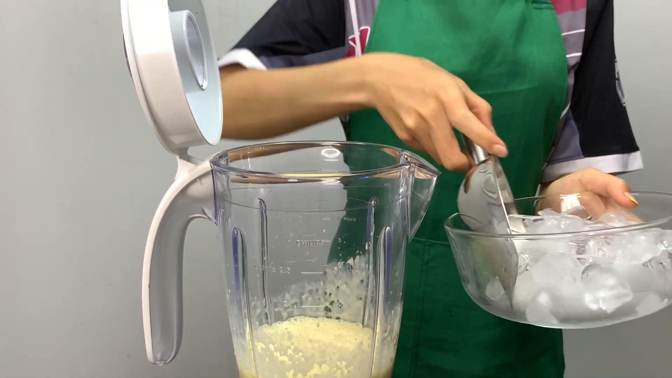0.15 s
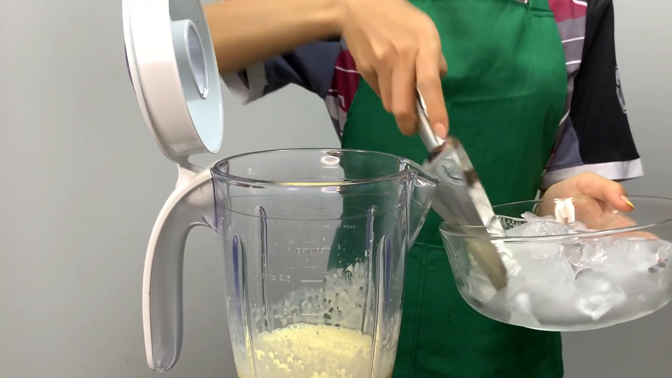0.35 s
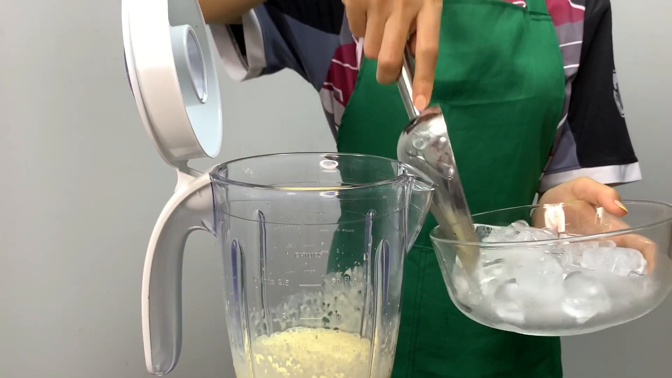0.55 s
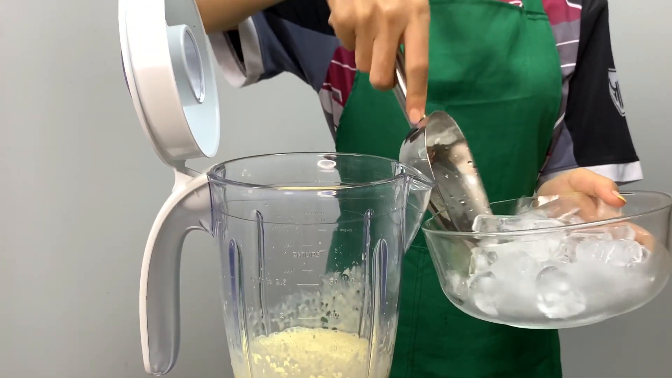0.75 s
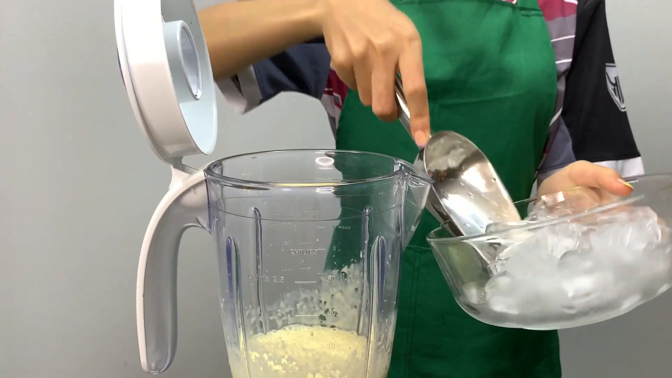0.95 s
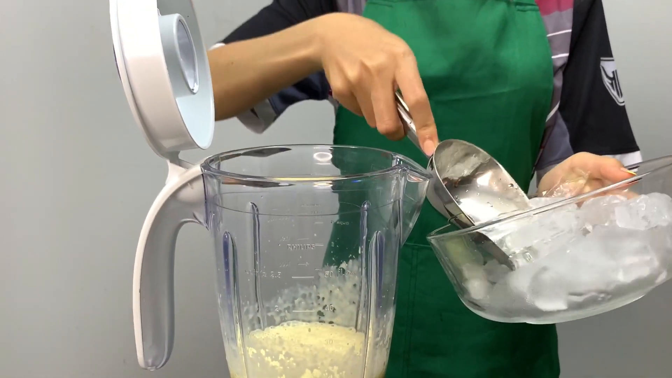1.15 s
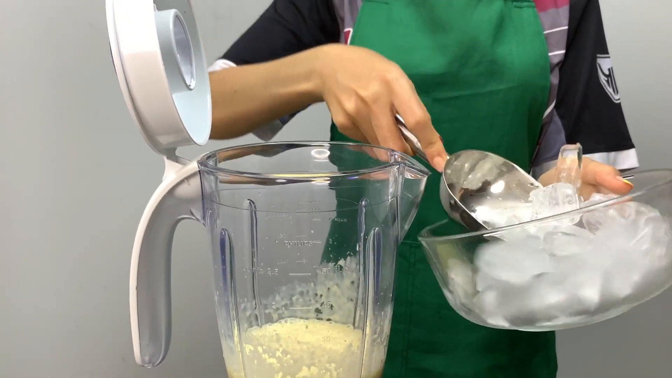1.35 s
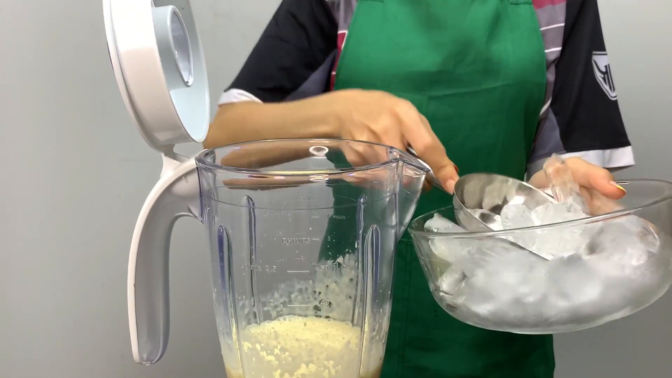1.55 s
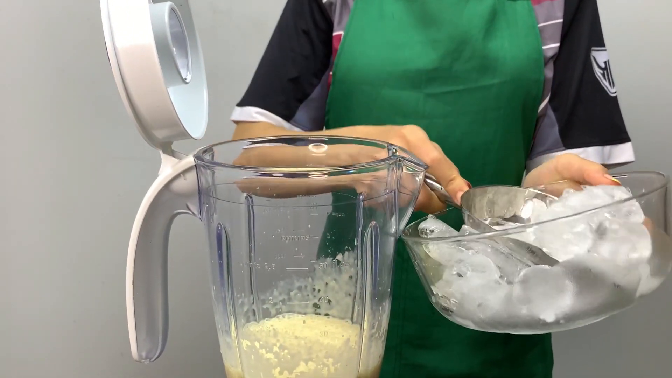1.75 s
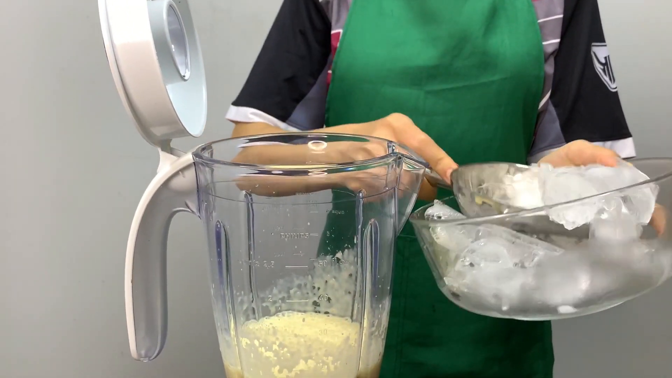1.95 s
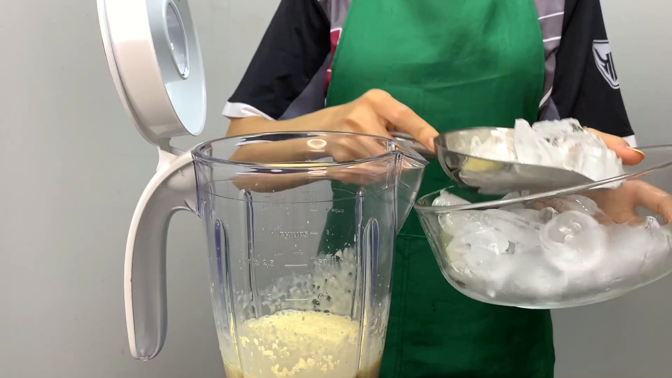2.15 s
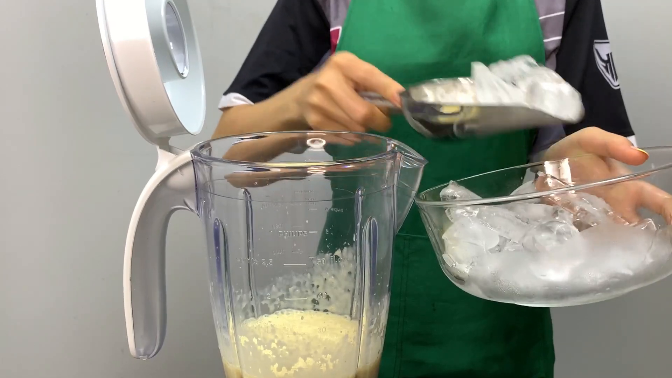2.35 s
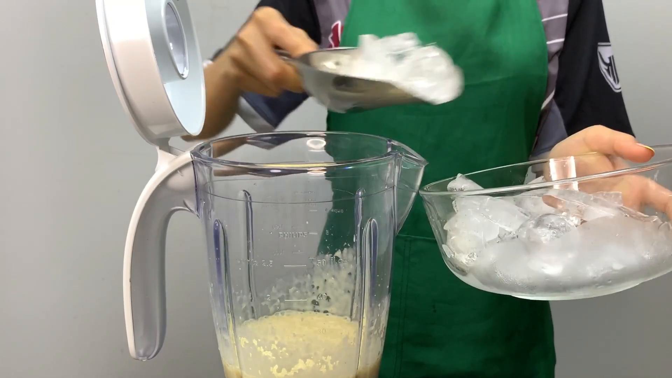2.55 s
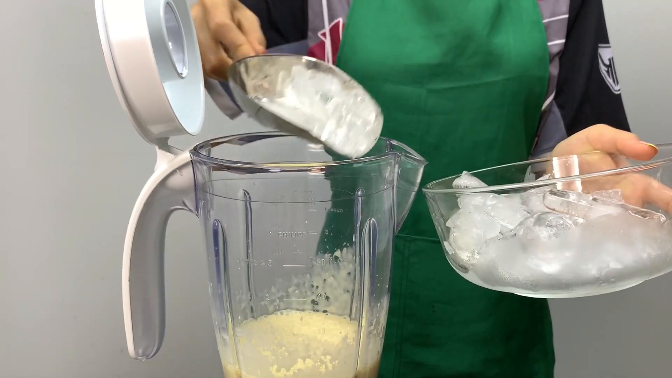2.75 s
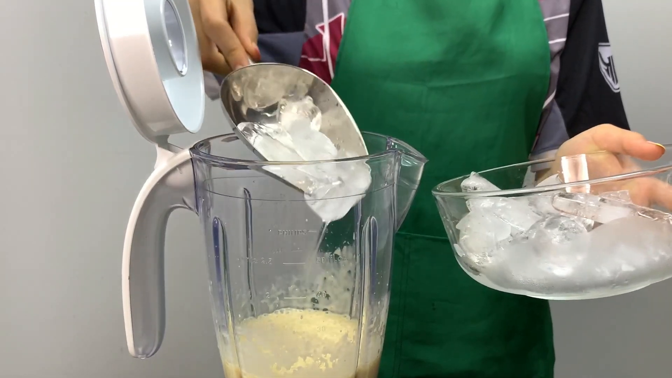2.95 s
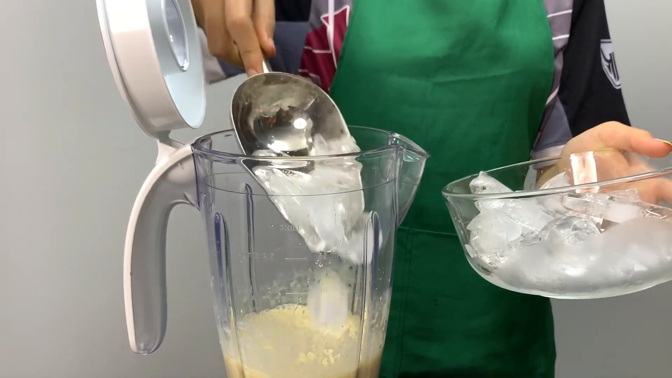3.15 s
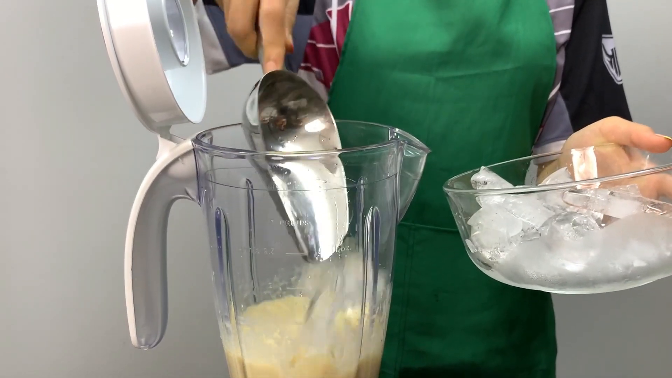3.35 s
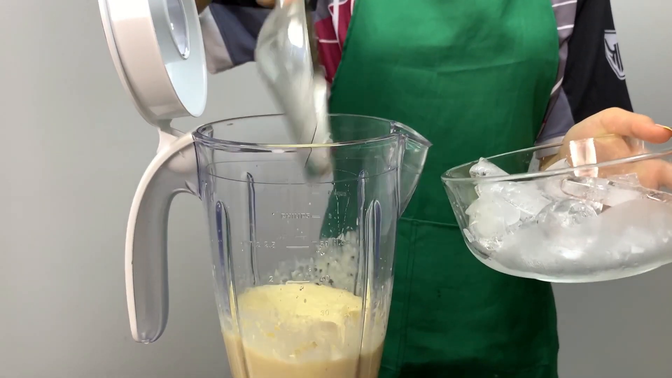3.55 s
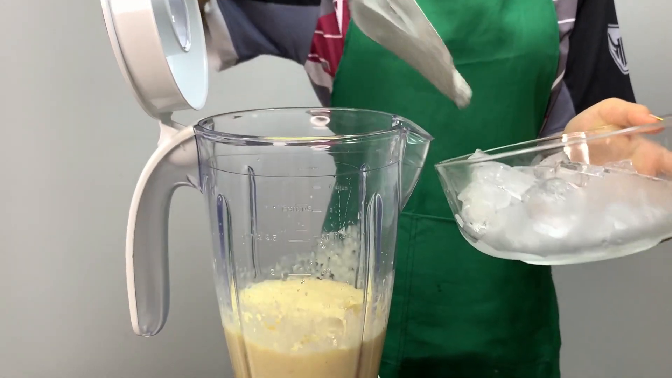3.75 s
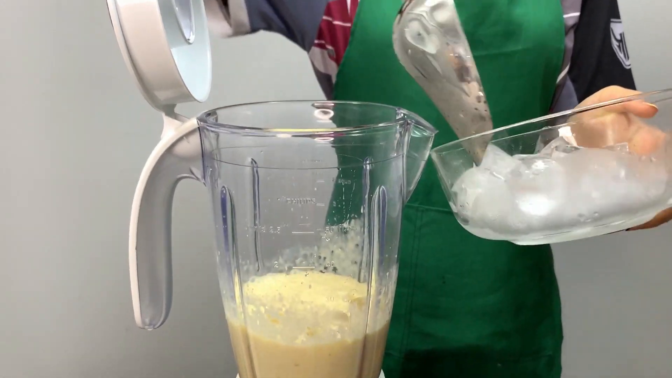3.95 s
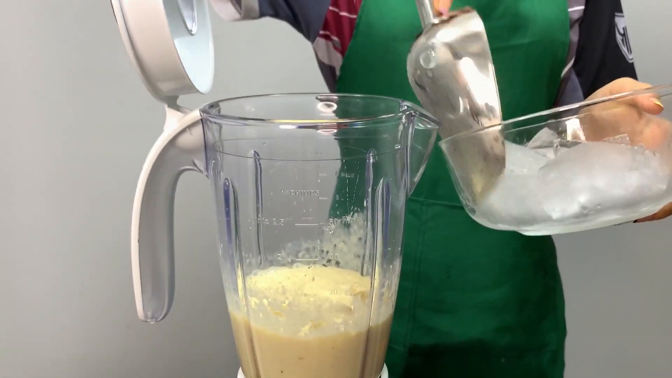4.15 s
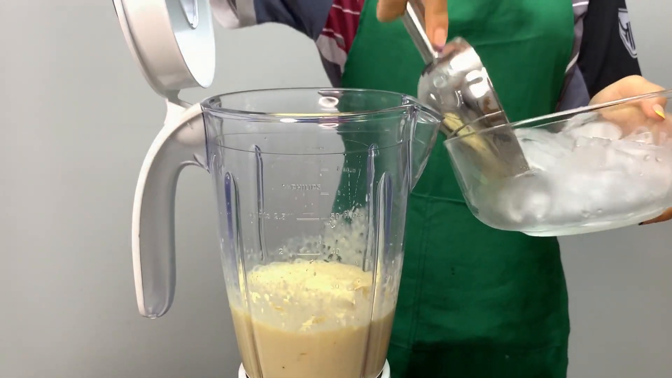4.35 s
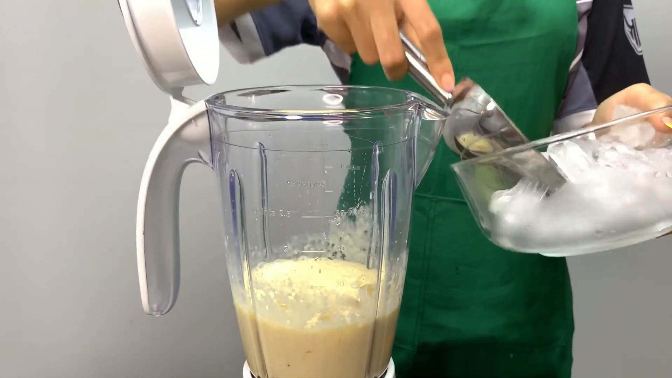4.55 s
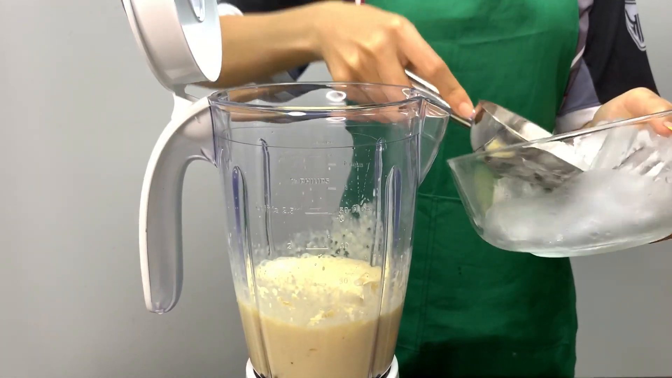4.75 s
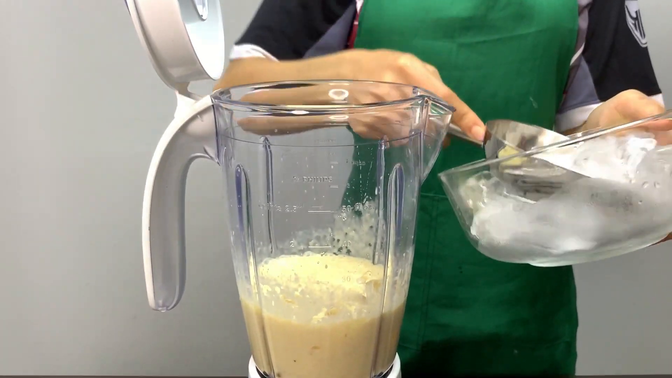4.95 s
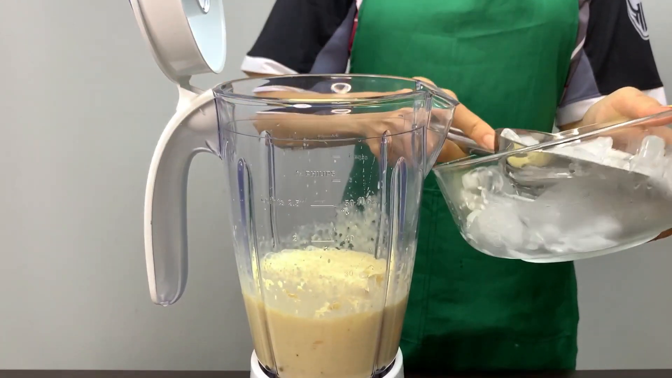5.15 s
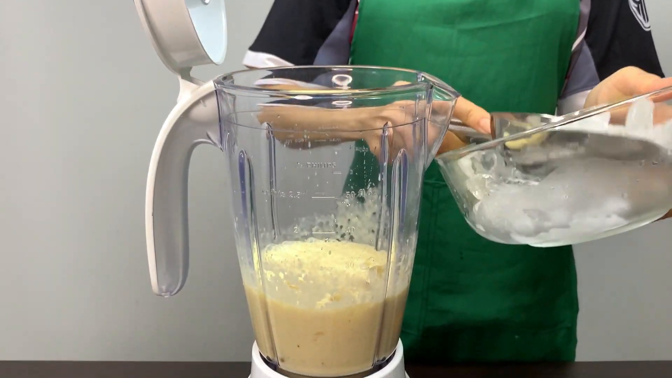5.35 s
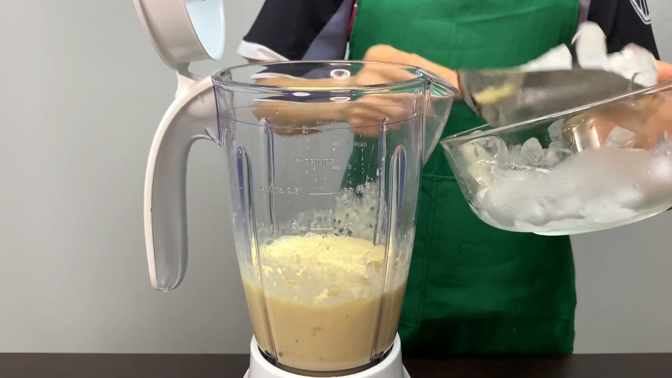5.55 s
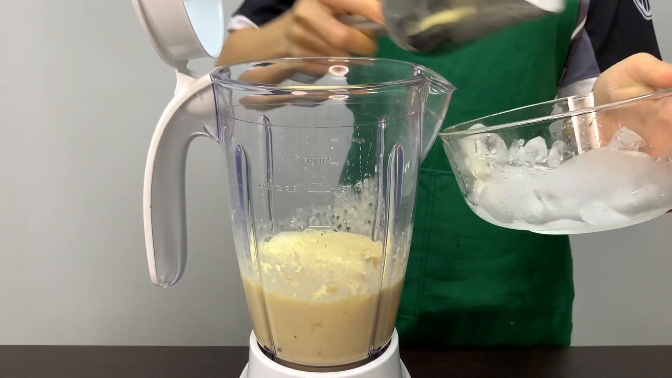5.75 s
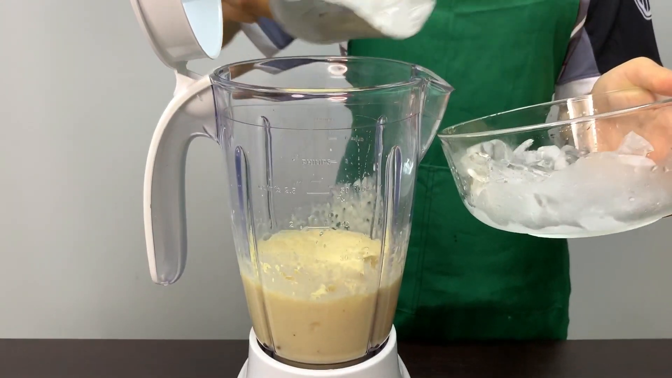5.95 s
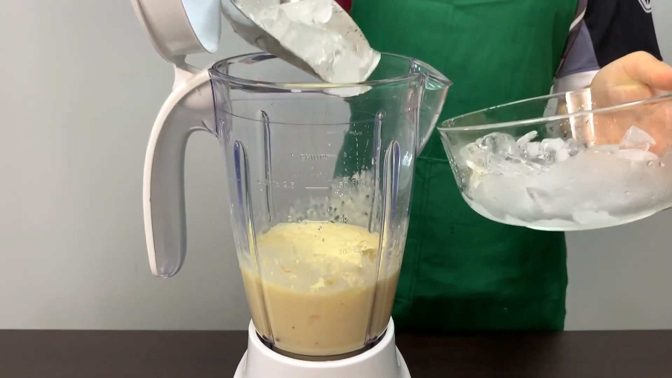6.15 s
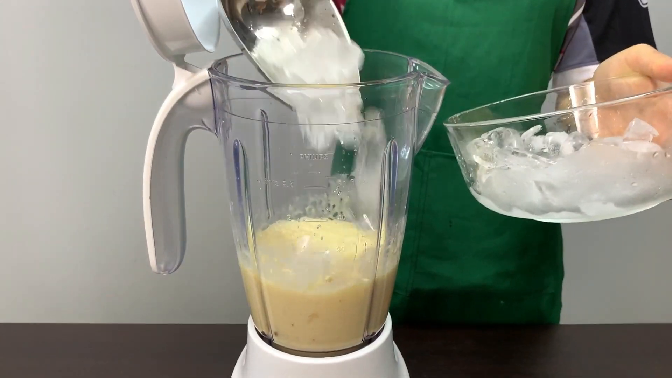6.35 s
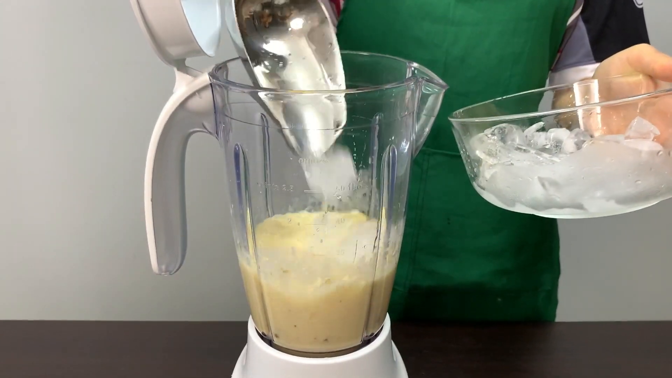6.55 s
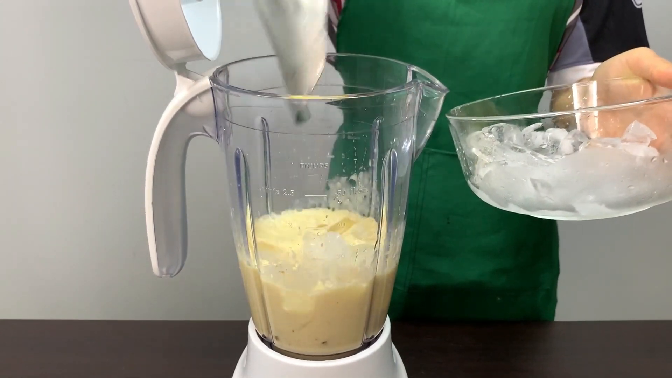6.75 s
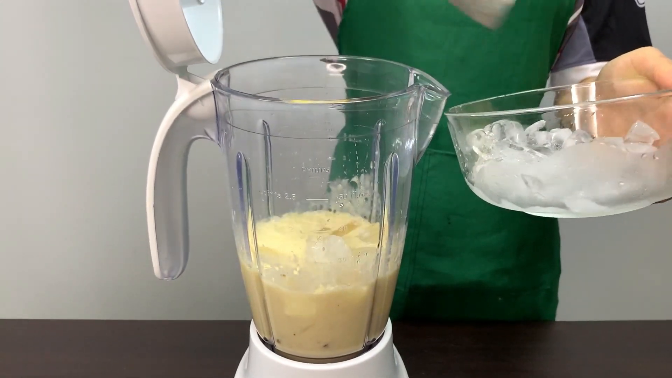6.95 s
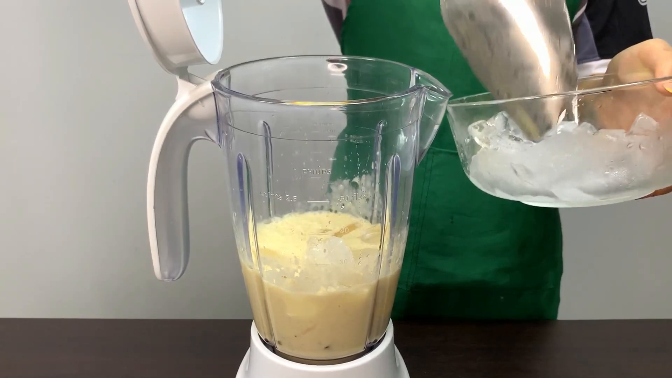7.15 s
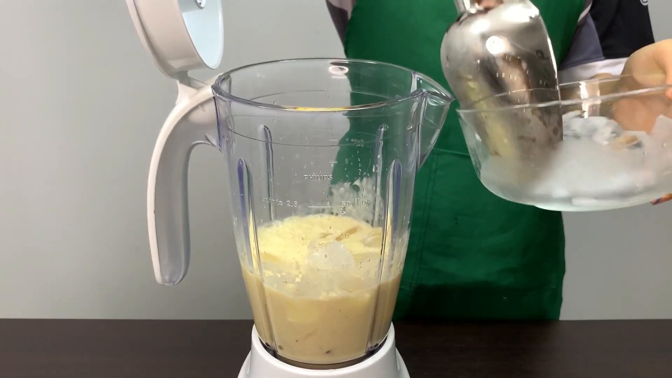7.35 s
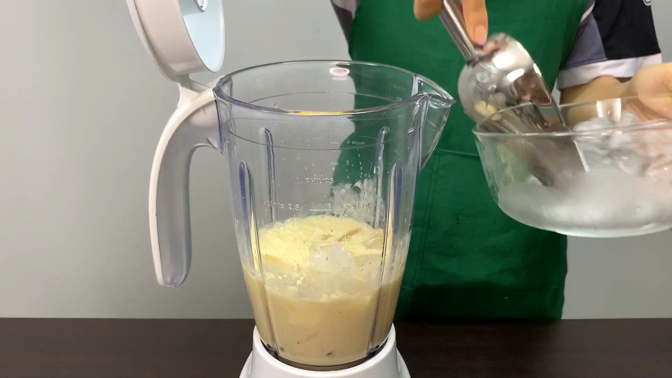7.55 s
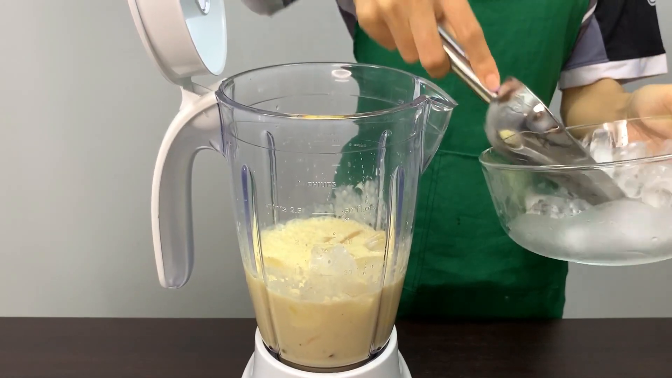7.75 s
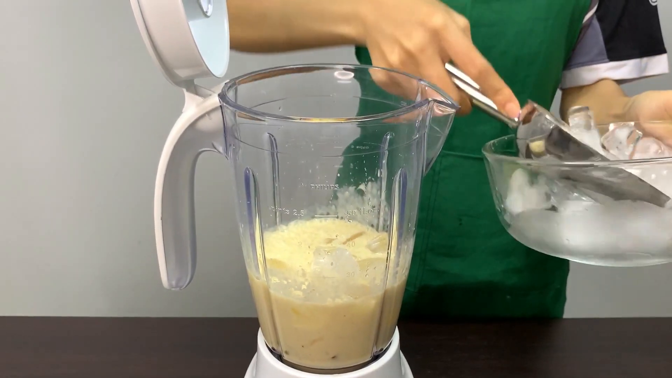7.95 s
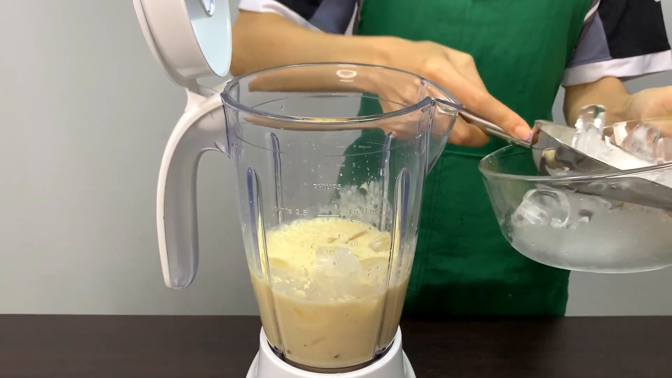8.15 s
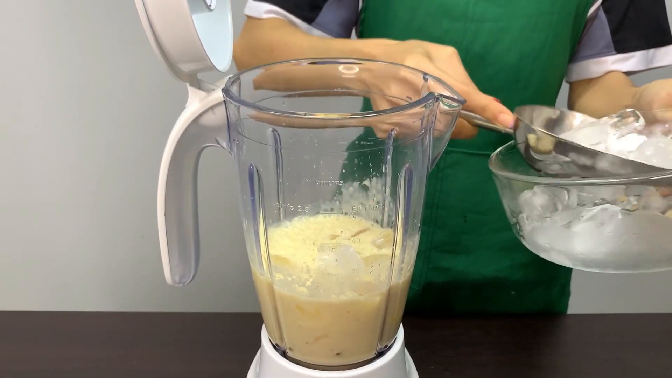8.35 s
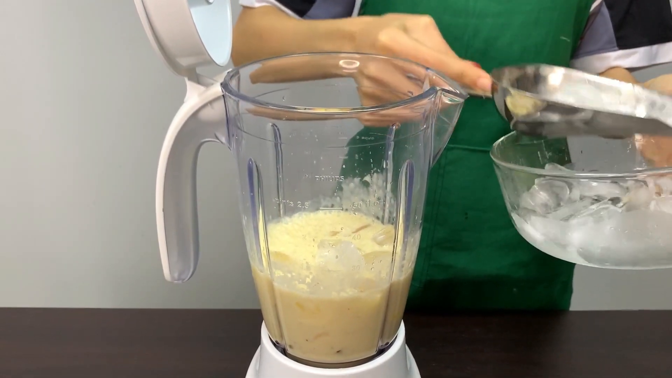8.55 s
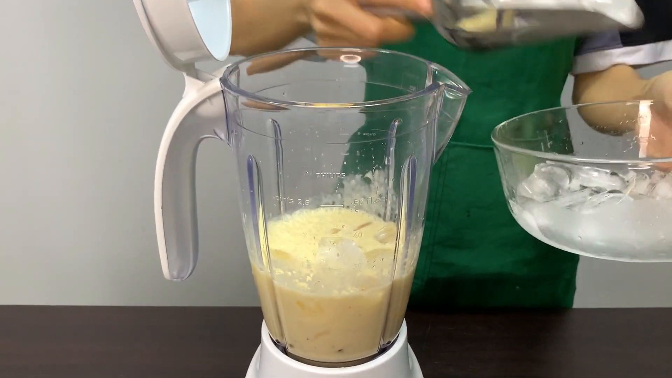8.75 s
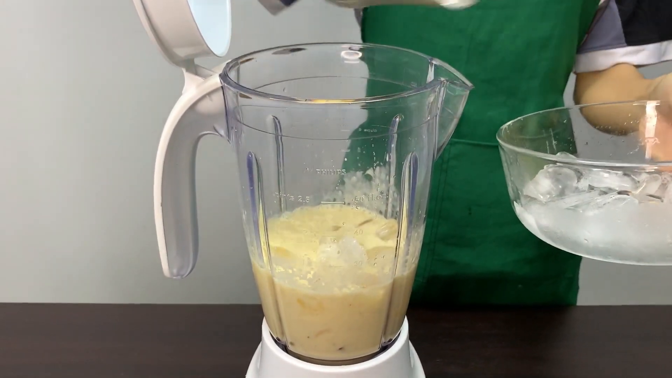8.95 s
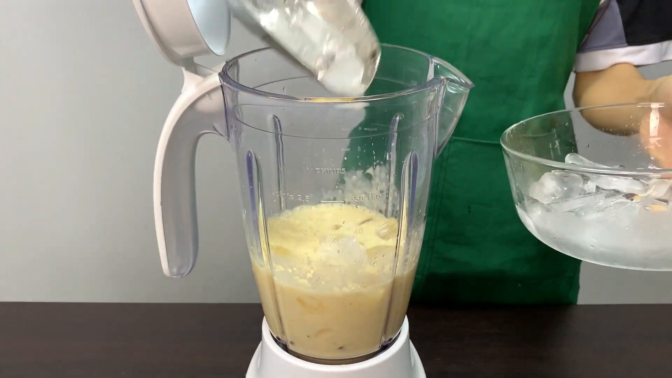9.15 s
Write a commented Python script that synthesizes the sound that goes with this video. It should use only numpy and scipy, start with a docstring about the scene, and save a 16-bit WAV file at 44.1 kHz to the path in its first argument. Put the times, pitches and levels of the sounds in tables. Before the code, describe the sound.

Wet ice cubes crack and rattle as a steel scoop pushes into them, its edge scraping and briefly ringing. After a short quiet carry, cubes drop into a plastic jar, knocking dully with soft bass thumps in the thick liquid. A second scoop and a denser pour follow, then a third dig that fades away. Close microphones, short bright room echoes, soft air hum.

```python
"""A metal scoop digs ice cubes from a glass bowl three times and tips two loads into a plastic blender jar.
Cubes crack and ring as damped modes; buried steel grinds as ticks through drifting resonances.
The struck scoop rings in sheet-metal modes; wet ice squeaks as slips drive a gliding resonance.
Falling ice gives sagging notes, dull knocks and bass pushes in the drink.
A small hard kitchen echoes and booms over a ventilation murmur; a close microphone pair listens."""
import sys
import numpy as np
from scipy import signal
from scipy.fft import rfft, irfft, next_fast_len
from scipy.io import wavfile
from scipy.ndimage import uniform_filter1d

SR = 44100
rng = np.random.default_rng(int(sys.argv[2]) if len(sys.argv) > 2 else 0)


def waveform_to_disk(signal):
    """Save audio, clipped to [-1, 1], as 16-bit WAV at the path in sys.argv[1]."""
    frames = np.transpose(np.atleast_2d(signal))
    scaled = np.clip(frames, -1, 1) * 32767
    samples = np.round(scaled).astype(np.int16)
    wavfile.write(sys.argv[1], SR, samples)


N = 406161

# All levels in the tables are relative; the mix sets the final gains.
# Prominent cube clacks: (time [s], level [dB], lowest ring pitch [Hz], treble over level [dB],
# contact t60 [s]: short = clean crack, long = crunch)
CLACKS = [(.0805, -56.5, 2690, 0.5, 0.06), (.194, -72, 1000, -13, .02), (.256, -52, 1900, -14, 0.17),
          (.281, -49.5, 1460, -6, 0.11), (.402, -56.5, 1770, 0, 0.09), (.430, -50.5, 1400, -7, 0.089),
          (.474, -51, 1630, -11, .07), (.525, -52, 5900, 4.5, 0.087), (.546, -45.5, 6300, -7, 0.077),
          (.5754, -40.5, 6320, 1.5, .03), (.6015, -39, 1580, -19, 0.092), (.687, -52, 2360, -2, .03),
          (.733, -50, 6400, -1.5, 0.026), (.789, -38.5, 3160, -11.5, .025), (.8212, -39.5, 4040, -14, .05),
          (.842, -41, 4080, -13, .04), (.860, -41.5, 4000, -22.5, .05), (.9097, -39, 1680, 0.5, 0.031),
          (.998, -48, 1490, -16, 0.033), (1.049, -43, 1590, -13, .015), (1.071, -38.5, 3270, -3.5, 0.021),
          (1.085, -36.5, 6360, 3, 0.026), (1.0978, -32, 1350, -8.5, 0.061), (1.186, -38, 1900, -0.5, 0.026),
          (1.1928, -36, 3370, -4, 0.036), (1.259, -50, 2520, 3, .04), (1.3367, -31.5, 1320, -9.5, 0.056),
          (1.376, -34.5, 1960, -19, 0.036), (1.491, -31.5, 980, -7, 0.047), (1.552, -29, 1406, -5, .035),
          (1.582, -36, 2040, -2, 0.045), (1.663, -33, 1400, -8, .05), (1.704, -36.5, 3180, -3, 0.029),
          (1.722, -35, 1399, -10, .05), (1.7492, -35, 1360, -2.5, .05), (1.787, -37.5, 1580, -5, .02),
          (1.8972, -42.5, 7670, 4.5, 0.064), (1.9936, -39.5, 2690, -2.5, 0.042), (2.12, -42, 920, -18, .04),
          (2.14, -29.5, 2840, -10, 0.055), (2.154, -39.5, 2940, -17, 0.049), (2.222, -44, 1580, -15, 0.055),
          (2.548, -54.5, 2160, -23, .08), (2.602, -50, 1630, -25, 0.084), (2.607, -52, 4470, -19, .02),
          (2.62, -56.5, 1370, -18, 0.033), (2.639, -58.5, 1990, -25, .06), (2.93, -49.5, 3000, -15, 0.041),
          (2.9415, -33.5, 1670, -9.5, 0.023), (2.9524, -31, 1100, -5.5, 0.037),
          (2.975, -44, 2330, -16, .04), (3.092, -49.5, 4000, -1, .025), (3.1288, -35.5, 1070, -15, 0.026),
          (3.146, -44, 1100, -19.5, 0.033), (3.208, -40.5, 1120, -4, 0.079), (3.296, -46.5, 2800, 1.5, .04),
          (3.3088, -38.5, 3113, -1.5, .04), (3.3271, -25.5, 2496, -1, 0.067), (3.353, -34, 1900, -6, .02),
          (3.3694, -33, 1450, -2, .04), (3.387, -40, 2300, -7.5, .02), (3.402, -33, 1990, -2.5, .025),
          (3.412, -39, 1300, -4, .02), (3.4275, -25, 4150, -6.5, .03), (3.471, -33, 1497, -21, 0.034),
          (3.61, -56.5, 1100, -21.5, .03), (3.66, -55.5, 1790, -18, 0.12), (3.984, -61, 1510, -21, .03),
          (4.0121, -46, 1640, -8, .04), (4.034, -54, 1100, -16, .03), (4.062, -52.5, 3920, -19.5, 0.016),
          (4.072, -51.5, 2200, -23, 0.028), (4.1415, -27.5, 1256, 0, 0.036),
          (4.157, -41.5, 1370, -15, 0.027), (4.2103, -37.5, 2890, 2.5, 0.06),
          (4.312, -35.5, 2460, -1.5, 0.038), (4.3955, -36.5, 1590, -5.5, 0.041),
          (4.458, -40.5, 1530, -5, 0.044), (4.515, -40, 1387, -7, .04), (4.54, -51, 3330, -18, 0.049),
          (4.6169, -34, 3550, -1, 0.11), (4.682, -35.5, 1750, -5, 0.082), (4.718, -32.5, 1870, -4.5, 0.063),
          (4.774, -36, 1900, -10, .025), (4.804, -37.5, 2260, -4, .025), (4.835, -34, 1630, -4.5, 0.049),
          (4.931, -38, 3600, -21, 0.044), (4.963, -36, 3450, -13, 0.053), (4.991, -33.5, 1400, -19, 0.022),
          (5.039, -38, 6190, -7.5, .04), (5.079, -40.5, 1440, -12, .04), (5.133, -40, 1430, -3, 0.05),
          (5.181, -35.5, 1440, -12, 0.025), (5.199, -37.5, 2170, -17, .025), (5.222, -36, 1050, -6.5, .05),
          (5.274, -42.5, 1460, -3, .05), (5.295, -41, 1600, -4.5, 0.031), (5.528, -61, 1450, -9, 0.027),
          (5.564, -54.5, 710, -14, 0.034), (5.649, -52, 6100, -10, .04), (5.6565, -41.5, 1720, 2, 0.024),
          (5.723, -45.5, 5360, -7, 0.039), (5.737, -60.5, 1510, 4, .025), (5.752, -51.5, 4640, 9, 0.022),
          (5.772, -56.5, 3897, 12.5, 0.021), (5.8421, -60, 4640, 13.5, 0.077),
          (5.953, -59, 1640, -2, 0.066), (6.013, -57, 3520, -13, .025), (6.0447, -51.5, 2930, -16, .02),
          (6.097, -61, 1490, -23, .03), (6.282, -49.5, 3880, -3, 0.13), (6.337, -35.5, 1770, -3, 0.021),
          (6.3579, -30.5, 4200, 3, 0.034), (6.4143, -29, 1110, -4, .03), (6.4295, -28, 3460, -6.5, .03),
          (6.451, -28.5, 1316, -8.5, 0.018), (6.463, -35, 2210, -6, .02), (6.4882, -30, 2900, -1, 0.023),
          (6.516, -32, 1210, -3, .025), (6.5228, -24.5, 1106, -7, .03), (6.535, -36, 1500, -6, .03),
          (6.545, -29.5, 4040, -8, .035), (6.595, -38, 2580, -4, 0.017), (6.608, -28.5, 1030, -12, 0.023),
          (6.618, -35.5, 3700, 1.5, .025), (6.637, -30, 3830, -3.5, 0.021), (6.648, -38, 2993, -12.5, .02),
          (6.654, -34.5, 1540, -18, .025), (6.707, -36, 2430, -7.5, .02), (6.712, -36, 1640, -4.5, 0.025),
          (6.76, -45, 1400, -19, 0.036), (7.146, -60, 1000, -18, 0.012), (7.2986, -49.5, 8400, -5, 0.044),
          (7.313, -45, 3850, -3, 0.063), (7.421, -46, 3180, -12, .012), (7.444, -52.5, 3870, 0, 0.033),
          (7.564, -41.5, 3130, -8, 0.026), (7.582, -37, 1780, -12, .05), (7.647, -49, 1330, -16, 0.045),
          (7.674, -47.5, 1313, -22, 0.043), (7.721, -38.5, 1360, -24, 0.034),
          (7.749, -37.5, 1342, -21, 0.037), (7.7696, -34.5, 1740, -7.5, 0.072),
          (7.83, -27.5, 3160, -8.5, 0.018), (8.0057, -33.5, 1510, -4.5, .04),
          (8.026, -29.5, 1520, -4.5, 0.04), (8.0387, -27, 2940, -8, 0.061), (8.073, -31, 3550, -5, 0.068),
          (8.1596, -30, 1350, -6.5, 0.03), (8.1724, -28.5, 2780, -24, 0.017),
          (8.245, -43, 3300, -18, 0.018), (8.279, -37.5, 2940, -22, 0.016), (8.34, -38.5, 3380, -6, .03),
          (8.355, -35, 2867, -9, .04), (8.3693, -34.5, 1480, -6, 0.062), (8.4127, -41.5, 3520, 6.5, 0.076),
          (8.4563, -28.5, 2856, -9.5, .03), (8.465, -34.5, 1793, -2.5, .015), (8.501, -40.5, 910, -7, .06),
          (8.515, -41, 2600, 4, 0.033), (8.5327, -34.5, 3200, -2.5, 0.015), (8.552, -55, 1600, -10, 0.027),
          (8.577, -44, 3040, -13, .04), (8.626, -48, 1640, -5, .025), (8.681, -46.5, 3270, -5.5, .03),
          (8.715, -53.5, 4000, 1, .025), (8.741, -61.5, 3100, 9.5, 0.035),
          (8.762, -49.5, 1900, -18.5, 0.057), (8.777, -50.5, 1560, -18, .025),
          (8.801, -51, 2530, -9, 0.026), (8.868, -58, 2700, 0, 0.021), (9.084, -84, 8200, 2, 0.014),
          (9.117, -85, 1216, -25, .02)]
# Dull blows on jar, drink and bowl: (time [s], knock [dB], middle pitch [Hz], bass push [dB])
THUDS = [(.602, -57.5, 720, -81), (1.1, -44, 700, -74), (1.492, -60, 700, -65), (1.702, -61, 388, -49),
         (1.775, -57, 406, -50), (2.075, -69, 428, -64), (2.245, -46.5, 468.5, -50.5),
         (2.941, -41.5, 546, -62), (2.953, -44, 602, -57.5), (2.974, -39.5, 456, -51.5),
         (2.991, -42, 385, -47.5), (3.129, -35.5, 420, -47), (3.33, -39.5, 468, -40.5),
         (3.38, -40.5, 495, -45.5), (3.44, -38.5, 490, -51.5), (3.472, -37, 517, -47),
         (3.509, -38.5, 507, -49), (3.565, -54.5, 470, -52), (3.65, -59.5, 447, -49.5),
         (3.984, -49, 490, -52), (4.143, -42.5, 592, -71), (4.312, -52, 610, -66.5),
         (4.396, -51, 557, -75.5), (4.46, -65, 620, -72), (4.618, -58, 640, -76), (4.681, -51, 520, -64.5),
         (5.735, -51.5, 443, -54.5), (6.187, -37.5, 532, -43.5), (6.338, -41, 550, -49.5),
         (6.36, -45.5, 474, -37.5), (6.45, -33.5, 510, -37), (6.473, -33.5, 490, -54.5),
         (6.523, -36, 490, -38.5), (6.564, -38, 544.7, -40), (6.594, -35, 510, -52),
         (6.622, -49.5, 520, -40), (6.649, -45.5, 500, -44.5), (6.683, -37.5, 588, -52.5),
         (6.71, -35, 527, -40.5), (6.744, -48, 563, -56), (7.146, -51, 584, -61.5), (8.172, -43, 670, -66)]
# Blows on the scoop: (time [s], ring [dB], crack [dB], brightness [dB/octave], contact t60 [s],
# pitch favoured by the struck spot [Hz], share of ring time left by the load [1])
SCOOP_HITS = [(1.086, -46, -39.5, 0, .048, 1380, .8), (2.139, -41, -48, -10.5, .059, 4150, 1),
              (2.164, -46, -51, -4, .05, 4150, .9), (4.1417, -32.5, -38.5, 2, .05, 1330, .9),
              (4.158, -41.5, -55, 3, .042, 2900, 1), (7.321, -36.5, -37, -3.5, .09, 3833, 0.37),
              (7.343, -44, -44, 14, .031, 3833, .45), (7.831, -53, -33, 2.5, .06, 3230, .5),
              (8.455, -31.5, -42, -1, .03, 4200, .35), (8.465, -39, -53, 1, .02, 2900, .25),
              (8.5, -40, -43, -3, 0.1, 3030, .4)]
# Nominal modes of the unloaded scoop: (frequency [Hz], level [dB], t60 [s])
SCOOP_MODES = [(1250, -12.5, 0.16), (1406, -10, 0.05), (1646, -4.5, .15), (2430, -12, .08),
               (2896, 1.5, .12), (3160, -2, 0.07), (3320, -2.5, 0.17), (3833, -8, 0.33), (4150, -4.5, .13),
               (4230, 4.5, 0.069), (5820, 6.5, 0.077), (6260, -11.5, 0.092), (6770, -5.5, 0.19),
               (7000, -8.5, 0.097), (8160, -9.5, 0.48), (8400, -3.5, .13), (9040, -9, .15),
               (9620, -9.5, .15), (10040, -6.5, .15), (10510, -8, .12), (13200, -4, .08)]
# Pushes of the scoop into the heap: (start [s], hardest [s], end [s], level [dB], easing by the end [dB])
DIGS = [(0.213, 0.858, 1, -49, -10.5), (0.998, 1.567, 1.86, -38, -9.5), (1.802, 2.09, 2.226, -47.5, -2),
        (4.002, 4.721, 5.02, -41, 0.5), (5.064, 5.193, 5.284, -41, -4), (7.328, 7.38, 7.6, -58, -2.5),
        (7.602, 8.003, 8.31, -38.5, -9.5), (8.288, 8.367, 8.62, -48, -5)]
# Broad resonances of the buried scoop: (centre [Hz], width [Hz], level [dB])
GRIND_MODES = [(720, 90, -3.5), (1400, 380, 0), (1900, 680, -4), (3700, 1100, -2.5), (6000, 550, -6.5)]
GRIND_SHIFT_DB = 6  # level drift per unit of wander
# Spectrum of digging: (frequency [Hz], density [dB])
DIG_COLOUR = [(100, -34), (300, -3), (520, -9), (720, 0), (1350, -1), (2000, -2), (4000, 0), (5000, -9.5),
              (6200, -6.5), (7600, -18.5), (8300, -6.5), (10000, -19.5), (13000, -7.5), (15500, -27.5)]
# Spectrum of sliding cubes: (frequency [Hz], density [dB])
SLIDE_COLOUR = [(200, -14.5), (600, 2.5), (1200, -5), (2000, 1), (3800, 6), (5000, -8.5), (6400, -5),
                (10000, -7.5), (15500, -12)]
# Spectrum of hard contacts: (frequency [Hz], density [dB])
CRACK_COLOUR = [(100, -36), (350, -11), (750, 2.5), (1400, 5.5), (2200, 5), (4000, 5), (5000, -0.5),
                (6200, -0.5), (7600, -8), (8400, -8.5), (11000, -9), (14000, -11.5), (15500, -20)]
# Spectrum of ventilation: (frequency [Hz], density [dB])
AIR_COLOUR = [(20, -22), (50, -11.5), (90, -3.5), (115, 5), (135, -7), (190, 2.5), (260, -7), (380, -3),
              (520, -14), (1000, -20), (2500, -29.5), (8000, -41), (16000, -50.5)]
# Low standing waves of kitchen and jar: (frequency [Hz], level [dB], t60 [s])
BOOM_MODES = [(117.7, -60.5, 1.9), (153.8, -59.5, 1.2), (192.2, -57.5, 0.72), (229, -63.5, 0.98)]
# Diffuse kitchen tail: (frequency [Hz], t60 [s], level [dB])
TAIL = [(130, 1, 1.5), (383, 0.63, -2.5), (1000, 0.56, -1.5), (2800, 0.53, -0.5), (7040, 0.39, -1),
        (14000, 0.32, -3.5)]
# Stereo width: (frequency [Hz], side [dB])
WIDTH = [(40, 0), (150, -14), (400, -8), (900, -1.5), (2500, -0.5), (7800, 2.5), (9000, -2), (12000, -14.5),
         (16000, -16.5)]
# Stereo balance: (frequency [Hz], left over right [dB])
BALANCE = [(100, -0.5), (650, -2), (1000, 1), (3000, 0.5), (4300, -0.5), (5700, -3.5), (7600, -0.5),
           (8200, -7.5), (10000, 0.5)]
# Spectrum of dull knocks: (frequency [Hz], density [dB])
KNOCK_COLOUR = [(80, -25.5), (200, -9.5), (300, -6), (400, 3), (510, -0.5), (630, -0.5), (800, -7),
                (1100, -14), (1600, -18.5), (3000, -26), (7000, -38)]
# Spectrum of bass pushes: (frequency [Hz], density [dB])
PUSH_COLOUR = [(25, -36.5), (55, -15.5), (90, -14.5), (115, -6), (150, 2), (192, 8), (235, 0.5), (300, -28),
               (600, -47), (3000, -77)]
# Spectrum of bumps in the thick drink: (frequency [Hz], density [dB])
SLOSH_COLOUR = [(25, -37.5), (60, -29), (95, -12), (120, 2.5), (190, 1.5), (260, -4), (380, 1), (500, -3),
                (620, -10.5), (760, -19), (1100, -14.5), (2000, -35), (6000, -70.5)]
# Wet ice scraping on steel: (time [s], length [s], first pitch [Hz], last pitch [Hz], level [dB])
SQUEAKS = [(0.787, 0.12, 3030, 3230, -53), (0.84, 0.032, 6300, 6300, -49), (1.343, 0.055, 1170, 1310, -41),
           (1.403, 0.02, 5900, 5100, -39), (1.555, 0.1, 1430, 1270, -42.5),
           (1.995, 0.011, 5860, 6700, -38.5), (2.061, 0.036, 4450, 3150, -41),
           (2.85, 0.059, 2900, 2500, -70), (4.651, 0.051, 1400, 1680, -39),
           (4.818, 0.13, 6260, 5850, -42.5), (4.893, 0.075, 3850, 3520, -40.5),
           (5.008, 0.057, 6150, 6700, -42), (5.139, 0.086, 1400, 1560, -43.5),
           (7.418, 0.01, 3070, 3420, -41.5), (7.54, 0.057, 1680, 1850, -53),
           (7.67, 0.013, 1250, 1290, -45.5), (7.936, 0.018, 5960, 5500, -35),
           (8.342, 0.037, 1400, 1450, -48), (8.778, 0.039, 2390, 2500, -55.5)]
# Load shifting in the carried scoop: (start [s], busiest [s], end [s], level [dB], easing by the end [dB])
CARRIES = [(2.487, 2.606, 2.68, -61, -15), (5.496, 5.802, 6.08, -65.5, -10), (8.6, 8.719, 8.82, -63.5, -17)]
# Load sliding into the jar: (start [s], densest [s], empty [s], ice level [dB], drink level [dB])
POURS = [(3.268, 3.347, 3.48, -44, -44.5), (6.315, 6.45, 6.64, -37, -43)]
# Ice sliver tinkling in the lifted scoop: (time [s], level [dB])
TINKLES = [(2.55, -72), (2.604, -57)]
# Modes of the sliver: (frequency [Hz], level [dB], t60 [s])
SLIVER_MODES = [(6428, 0, 0.2), (6520, -5, .15), (7321, 1, .14)]

BAND_EDGE_HZ = 15800
BLOW_TIME_S = np.arange(SR // 3) / SR
BLOW_SAMPLES = 530  # span over which a blow's level counts
PAN_DB = 5.5  # largest left-right difference of a cube
# Jostling cubes
JOSTLE_LOW_HZ, JOSTLE_HIGH_HZ, JOSTLE_T60_S = 1100, 4200, 0.029
JOSTLE_CRISP_DB, JOSTLE_CRISP_SPREAD_DB = -8, -4
# Smaller cubes landing in the drink; the bass push is relative to the knock
LANDING_HZ, LANDING_SPREAD_OCTAVES, LANDING_WEIGHT_DB = 490, 0.22, -13
# Bowl under each scoop blow; knock and bass push are relative to the crack
BOWL_HZ, BOWL_KNOCK_DB, BOWL_WEIGHT_DB = 565, -17, -33
# Movement: start level below the top, swell exponent (over 1 = quick at first), fade after the end
ENTRY_DB, SWELL_EXPONENT, SETTLE_DB_PER_S = -15, 1.32, 148.5
TOUCH_S = 0.022  # time to bring the first cubes into contact
# Pour: thinning towards its end, delay of the drink, fade of the drink
POUR_EASE_DB, FALL_S, CALM_DB_PER_S = -3, 0.037, 78.5


def amp(db):
    """Decibels to gain."""
    return 10 ** (np.asarray(db) / 20)


def evened(x, size=None):
    """Scales to rms 1, over the first size samples if given."""
    return x / np.sqrt(np.mean(x[..., :size] ** 2) + 1e-20)


def read(points, hz, axis=1):
    """Reads one column of a table on a log-frequency axis."""
    columns = np.transpose(points)
    return np.interp(np.log(hz + 1), np.log(columns[0] + 1), columns[axis])


def add(mix, time_s, sound):
    """Mixes a sound in at a time."""
    part = mix[..., max(round(time_s * SR), 0):][..., :sound.shape[-1]]
    part += sound[..., :part.shape[-1]]


def causal(points, size=2048):
    """Minimum-phase impulse response of a given spectrum."""
    log_gain = np.log(amp(read(points, abs(np.fft.fftfreq(size, 1 / SR)))))
    spectrum = np.exp(np.conj(signal.hilbert(log_gain)))
    return np.fft.ifft(spectrum).real[:size // 2]


def coloured(x, response):
    """Passes a signal through an impulse response."""
    return signal.fftconvolve(x, response)[:len(x)]


def decay(t, t60_s):
    """Exponential decay of 60 dB in t60_s."""
    return np.exp(-np.log(1000) * t / t60_s)


def rise(t, rise_s):
    """Smooth onset that approaches 1."""
    return 1 - np.exp(-t / rise_s)


def ring(modes, t):
    """A sum of dying sines from rows (frequency [Hz], level [dB], t60 [s])."""
    out = 0
    for hz, db, t60_s in modes:
        out = out + amp(db - 60 * t / max(t60_s, .003)) * np.sin(2 * np.pi * min(hz, SR / 2) * t)
    return out


def wander(length, per_s):
    """Random drift of about unit size with per_s new targets a second."""
    place = np.arange(length) * per_s / SR
    targets = rng.standard_normal(1024)
    return np.interp(place, np.arange(len(targets)), targets)


def resonate(x, hz, width_hz):
    """One-pole resonance that follows a pitch curve."""
    turn = np.exp(2j * np.pi * np.cumsum(hz) / SR)
    pole = np.exp(-np.pi * width_hz / SR)
    return (turn * signal.lfilter([1 - pole], [1, -pole], x / turn + 1e-18)).real


def burst(t60_s, t, rise_s=0.00062, uneven_db=4):
    """A contact: noise of uneven strength that builds quickly and dies away, as many tiny impacts do."""
    sizes = amp(uneven_db * np.clip(wander(len(t), per_s=1500), -2, 2))
    return sizes * rng.standard_normal(len(t)) * decay(t, max(t60_s, .002)) * rise(t, rise_s)


def cube(hz, t60_s, t):
    """The few unrelated, quickly damped modes of an irregular cube."""
    second_hz = hz * rng.uniform(1.15, 1.5)
    third_hz = hz * rng.uniform(2.1, 2.2)
    return ring([(hz, 0, t60_s), (second_hz, -6, t60_s), (third_hz, -8, t60_s * 0.27)], t)


def stroke(start_s, peak_s, end_s, db, ease_db, settle_db_per_s):
    """Gain of one movement through ice: it swells, eases off, and dies away after its end."""
    t = np.arange(N) / SR
    swell_db = ENTRY_DB * np.interp(t, [start_s, peak_s], [1, 0]) ** SWELL_EXPONENT
    late_db = np.interp(t, [peak_s, end_s], [0, ease_db]) - settle_db_per_s * np.maximum(t - end_s, 0)
    touch = np.clip((t - start_s) / TOUCH_S, 0, 1)
    return amp(db + swell_db + late_db) * touch * (late_db > -45)


def chance(gain, per_s, spread_db):
    """Collisions that follow the movement: rows (time [s], level [dB], two draws from -1 to 1)."""
    draws = rng.random((int(per_s * N / SR), 4))
    times_s = (np.arange(len(draws)) + draws[:, 0]) / per_s
    strengths = gain[np.minimum((times_s * SR).astype(int), N - 1)]
    rows = []
    for time_s, strength, (size, a, b) in zip(times_s, strengths, 2 * draws[:, 1:] - 1):
        if strength > 0:
            rows.append((time_s, 20 * np.log10(strength) + spread_db * size, a, b))
    return rows


def air(db=-65):
    """The steady low murmur of ventilation: shaped noise."""
    hz = np.fft.rfftfreq(N, 1 / SR)
    noise = rfft(rng.standard_normal((2, N)))
    return amp(db) * evened(irfft(noise * amp(read(AIR_COLOUR, hz)), N))


def clacks(rows, snap_share=0.37, ring_t60_s=0.017, ring_db=-2, split_hz=6300,
           body_db=-1, snap_db=-1, rebound=0.34):
    """Each cube cracks against its neighbour, rings and rebounds; a crisp snap rides on top."""
    out, t, colour = np.zeros((2, N)), BLOW_TIME_S[:4096], causal(CRACK_COLOUR)
    low = signal.butter(3, [330, split_hz], "band", fs=SR, output="sos")
    high = signal.butter(4, split_hz, "high", fs=SR, output="sos")
    for time_s, db, hz, crisp_db, contact_t60_s in rows:
        pan_db = PAN_DB * rng.uniform(-1, 1)
        contact = burst(contact_t60_s, t, rise_s=0.00093)
        add(contact, rng.uniform(0.0033, .012), rebound * burst(contact_t60_s / 2, t))
        crack = evened(signal.sosfilt(low, coloured(contact, colour)), size=BLOW_SAMPLES)
        snap_contact = burst(contact_t60_s * snap_share, t, rise_s=.0003)
        snap = evened(signal.sosfilt(high, coloured(snap_contact, colour)), size=BLOW_SAMPLES)
        note = evened(cube(hz, ring_t60_s, t) * rise(t, .003), size=BLOW_SAMPLES)
        body = evened(crack + amp(ring_db) * note, size=BLOW_SAMPLES)
        clack = amp(body_db) * body + amp(crisp_db + snap_db) * snap
        add(out, time_s, amp([[db + pan_db / 2], [db - pan_db / 2]]) * clack)
    return out


def jostles(gain, per_s, spread_db):
    """Lesser clacks of cubes that the movement pushes together, as rows like those of CLACKS."""
    rows = []
    for time_s, db, size, crisp in chance(gain, per_s, spread_db):
        hz = JOSTLE_LOW_HZ * (JOSTLE_HIGH_HZ / JOSTLE_LOW_HZ) ** ((size + 1) / 2)
        crisp_db = JOSTLE_CRISP_DB + JOSTLE_CRISP_SPREAD_DB * crisp
        rows.append((time_s, db, hz, crisp_db, JOSTLE_T60_S))
    return rows


def rattle(gain, colour, per_s, spread_db, ring_t60_s, grit_t60_s, ring_db, count=160):
    """A crowd of small collisions: each is a gritty scuff and the brief ring of one of the many cubes."""
    out, t = np.zeros(N), BLOW_TIME_S[:1200]
    grains = []
    for hz in np.linspace(800, 9000, count) * rng.uniform(0.93, 1.04, count):
        scuff = evened(burst(grit_t60_s, t, rise_s=0.00037))
        grains.append(amp(ring_db) * evened(cube(hz, ring_t60_s, t)) + scuff)
    slots = int(per_s * N / SR)
    for k, (place, which, size) in enumerate(rng.random((slots, 3))):
        at = min(int((k + 2 * place) * SR / per_s), N - 1)
        if gain[at] > 0:
            size_db = spread_db * (min(-np.log(1 - size), 3) - 1)  # many small, few large
            add(out, at / SR, gain[at] * amp(size_db) * grains[int(which * count)])
    out = coloured(out, causal(colour))
    return evened(out) * np.sqrt(np.mean(gain ** 2))


def grinding(gain, ticks_per_s=170, spread_db=3.0, drift=0.063, drifts_per_s=30, tick_db=-4):
    """The steel edge skips over ice; sharp ticks ring scoop resonances that drift as the contact shifts."""
    ticks = rng.choice([-1, 1], N) * (rng.random(N) < ticks_per_s / SR)
    ticks = ticks * amp(spread_db * np.minimum(rng.exponential(1, N), 3))
    ticks = coloured(ticks, causal(DIG_COLOUR))
    metal = 0
    for hz, width_hz, db in GRIND_MODES:
        shift = amp(GRIND_SHIFT_DB * np.clip(wander(N, drifts_per_s), -2, 1))
        pitch_hz = hz * (1 + drift * wander(N, drifts_per_s))
        metal = metal + amp(db) * evened(shift * resonate(ticks, pitch_hz, width_hz))
    return gain * evened(metal + amp(tick_db) * evened(ticks))


def thuds(rows, note_t60_s=0.057, knock_t60_s=0.054, note_db=-1, knock_db=-2.0, push_db=-3,
          sag=0.28, sag_s=0.0075, push_lag_s=0.01198):
    """Each heavy blow gives a dull knock, a hollow note that sags in pitch, and a later bass push."""
    out, t, knock_colour = np.zeros(N), BLOW_TIME_S, causal(KNOCK_COLOUR)
    push = evened(causal(PUSH_COLOUR, size=8192), size=3 * BLOW_SAMPLES)
    for time_s, db, hz, weight_db in rows:
        turns = np.cumsum(hz * (1 + sag * (np.exp(-t / sag_s) - .5))) / SR
        note = np.sin(2 * np.pi * turns) * decay(t, note_t60_s) * rise(t, 0.00089)
        note = evened(note, size=2 * BLOW_SAMPLES)
        knock = evened(coloured(burst(knock_t60_s, t), knock_colour), size=2 * BLOW_SAMPLES)
        add(out, time_s, amp(db) * (amp(note_db) * note + amp(knock_db) * knock))
        add(out, time_s + push_lag_s, amp(weight_db + push_db) * push)
    return out


def squeaks(slips_per_s=900, sharpness=16, drift=0.066, drifts_per_s=70):
    """Uneven slips drive one resonance of the dragged cube, which glides and wavers as the contact moves."""
    out = np.zeros(N)
    slips = rng.standard_normal(N) * (rng.random(N) < slips_per_s / SR)
    slips += 0.047 * rng.standard_normal(N)
    for time_s, length_s, first_hz, last_hz, db in SQUEAKS:
        drag = slips[round(time_s * SR):][:round(max(length_s, .005) * SR)]
        drive = np.pad(drag * signal.windows.tukey(len(drag), .5), (0, BLOW_SAMPLES))
        hz = np.interp(np.arange(len(drive)), [0, len(drag)], [first_hz, last_hz])
        hz = hz * (1 + drift * wander(len(drive), drifts_per_s))
        squeak = resonate(drive, hz, first_hz / sharpness)
        add(out, time_s, amp(db) * evened(squeak, size=len(drag)))
    return out


def scoop(pivot_hz=3500, spot_db=12, spot_octaves=0.072, detune=0.011):
    """Struck sheet metal: the spot sets the mode mix; ice against it shortens and detunes the modes."""
    out, t, colour = np.zeros(N), BLOW_TIME_S, causal(CRACK_COLOUR)
    for time_s, ring_db, crack_db, tilt_db, contact_t60_s, spot_hz, muffle in SCOOP_HITS:
        metal = np.zeros(len(t))
        for (hz, db, t60_s), sign in zip(SCOOP_MODES, rng.choice([-1, 1], len(SCOOP_MODES))):
            favour_db = spot_db * np.exp(-(np.log2(hz / spot_hz) / spot_octaves) ** 2)
            mode_db = db + tilt_db * np.log2(hz / pivot_hz) + favour_db
            mode_hz = hz * (1 + detune * rng.uniform(-1.1, 1))
            metal += sign * ring([(mode_hz, mode_db, t60_s * muffle)], t)
        metal = evened(metal * rise(t, 0.0014), size=BLOW_SAMPLES)
        crack = evened(coloured(burst(contact_t60_s, t), colour), size=BLOW_SAMPLES)
        add(out, time_s, amp(ring_db) * metal + amp(crack_db) * crack)
    return out


def bowl_knocks():
    """The bowl gives a dull knock under each blow of the scoop, as rows like those of THUDS."""
    return [(time_s, crack_db + BOWL_KNOCK_DB, BOWL_HZ, crack_db + BOWL_WEIGHT_DB)
            for time_s, _, crack_db, *_ in SCOOP_HITS]


def tinkles():
    """A loose sliver of ice rings high and clear in three modes."""
    out, t = np.zeros(N), BLOW_TIME_S
    for time_s, db in TINKLES:
        add(out, time_s, amp(db) * evened(ring(SLIVER_MODES, t) * rise(t, .002), size=BLOW_SAMPLES))
    return out


def slosh(gain, per_s=120):
    """Cubes jostle in the thick drink: many soft bumps through the jar."""
    bumps = rng.standard_normal(N) * (rng.random(N) < per_s / SR)
    return gain * evened(coloured(bumps, causal(SLOSH_COLOUR, size=8192)))


def landings(gain, per_s=20, spread_db=3):
    """Smaller cubes that drop into the drink, as rows like those of THUDS."""
    return [(time_s, db, LANDING_HZ * 2 ** (LANDING_SPREAD_OCTAVES * size), db + LANDING_WEIGHT_DB)
            for time_s, db, size, _ in chance(gain, per_s, spread_db)]


def kitchen(x, early_db=-4, early_t60_s=0.093, direct_db=-4.0, count=22):
    """Direct sound, first echoes from jar and counter, a diffuse tail and the booming low modes."""
    t = np.arange(SR * 3 // 2) / SR
    taps = rng.choice([-1., 1.], (2, len(t))) * (rng.random((2, len(t))) < 5000 / SR)
    taps = taps * rise(t, 0.002)
    hz, frame_s, bands = signal.stft(taps, SR, nperseg=512)
    t60_s = np.maximum(read(TAIL, hz), .05)[:, None]
    even_energy = np.sqrt(2 * np.log(1000) / t60_s / SR)
    bands = bands * amp(read(TAIL, hz, axis=2))[:, None] * decay(frame_s, t60_s) * even_energy
    response = signal.istft(bands, SR, nperseg=512)[1][:, :len(t)] / taps.std()
    for channel in response:
        at = 30 + np.arange(count) * 45 + rng.integers(0, 45, count)
        echoes = rng.choice([-1, 1], count) * decay(t[at], early_t60_s)
        channel[at] += amp(early_db) * echoes / np.linalg.norm(echoes)
    response[:, 0] += amp(direct_db)
    response += ring(BOOM_MODES, t)
    return signal.fftconvolve(x, response, axes=1)[:, :N]


def moving(x, count=4, hold_s=.06):
    """Moving hands, scoop and cubes alter the echo paths: the sound cycles through kitchen responses."""
    place = (np.arange(N) / SR / max(hold_s, .02)).astype(int) % count
    return sum(kitchen(x * uniform_filter1d(1. * (place == k), size=128)) for k in range(count))


def scene():
    """Digging, carrying and pouring drive the small collisions; all but the air sound in the kitchen."""
    dig = sum(stroke(*row, SETTLE_DB_PER_S) for row in DIGS)
    carry = sum(stroke(*row, SETTLE_DB_PER_S) for row in CARRIES)
    pour = sum(stroke(start_s, peak_s, end_s, ice_db, POUR_EASE_DB, SETTLE_DB_PER_S)
               for start_s, peak_s, end_s, ice_db, _ in POURS)
    churn = sum(stroke(start_s, peak_s + FALL_S, end_s + FALL_S, drink_db, POUR_EASE_DB, CALM_DB_PER_S)
                for start_s, peak_s, end_s, _, drink_db in POURS)
    blows = clacks(CLACKS) + thuds(THUDS + bowl_knocks()) + tinkles()
    blows = blows + amp(-0.5) * squeaks() + amp(4.5) * scoop()
    digging = amp(-4) * rattle(dig, DIG_COLOUR, per_s=100, spread_db=2,
                               ring_t60_s=0.026, grit_t60_s=0.011, ring_db=1.5)
    digging += amp(-3.0) * grinding(dig)
    sliding = amp(-4.0) * rattle(carry + pour, SLIDE_COLOUR, per_s=160, spread_db=3,
                                 ring_t60_s=0.028, grit_t60_s=0.01, ring_db=4.5)
    jostling = clacks(jostles(dig + carry, per_s=20, spread_db=1)
                      + jostles(amp(1) * pour, per_s=24, spread_db=0))
    drink = amp(-4.5) * slosh(churn) + thuds(landings(amp(-3) * churn))
    return moving(blows + digging + sliding + jostling + drink) + air()


def record(dry):
    """Microphone pair: width and balance vary with frequency, left treble lags, then the band limit."""
    size = next_fast_len(N + 2048)
    hz = np.fft.rfftfreq(size, 1 / SR)
    left, right = rfft(dry, size)
    width, balance_db = amp(read(WIDTH, hz)), read(BALANCE, hz)
    mid_side = np.array([left + right, width * (left - right)]) / 2
    mid, side = mid_side / np.sqrt(0.87 + 0.53 * width ** 2)
    # 0.297 ms lag, less one whole turn, blended in from 4.4 to 5.4 kHz
    turns = (hz * .000297 - 1) * np.interp(hz, [4400, 5400], [0, 1])
    late = np.exp(-2j * np.pi * turns)
    left_out = (mid + side) * late * amp(balance_db / 2)
    right_out = (mid - side) * amp(-balance_db / 2)
    pair = irfft([left_out, right_out], size)[:, :N]
    band_limit = signal.firwin(255, BAND_EDGE_HZ, window=("kaiser", 9), fs=SR)
    return signal.oaconvolve(pair, band_limit[None], "same")


dry = scene()
out = record(dry)
waveform_to_disk(out)
```